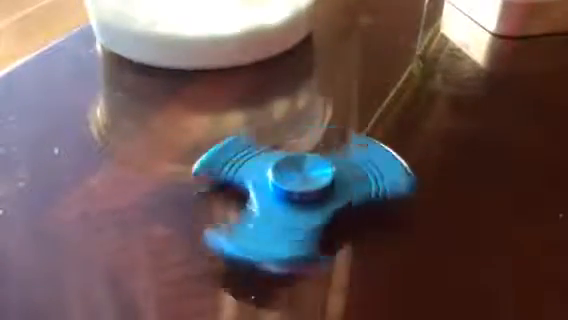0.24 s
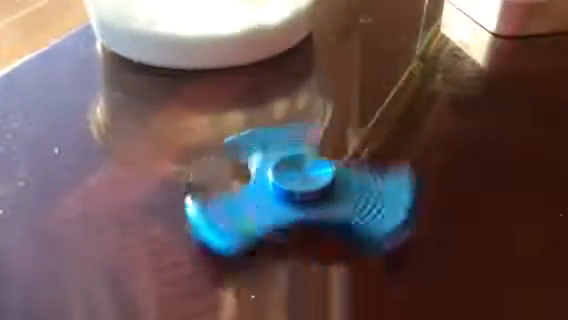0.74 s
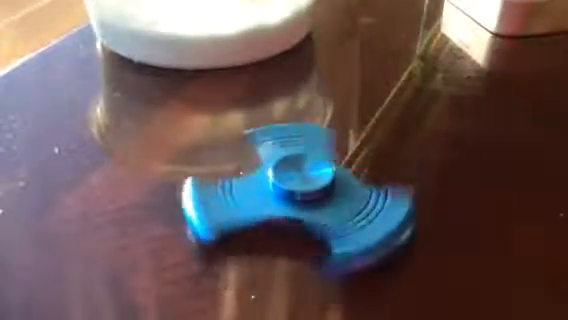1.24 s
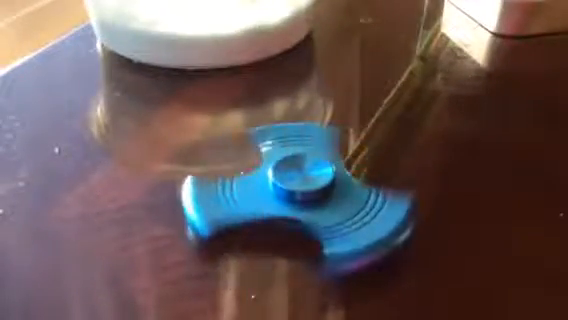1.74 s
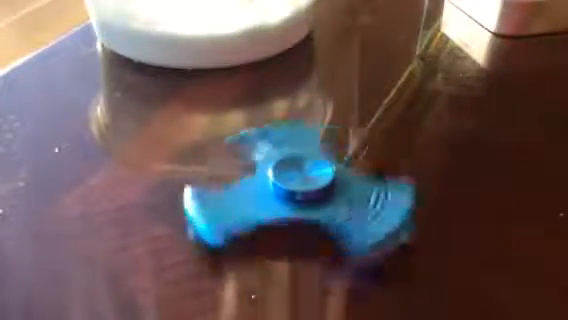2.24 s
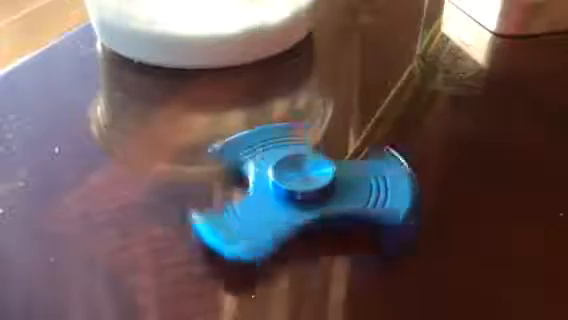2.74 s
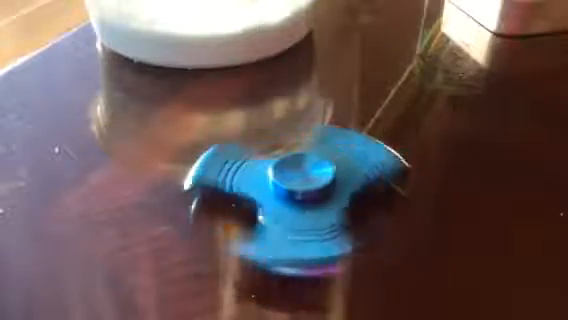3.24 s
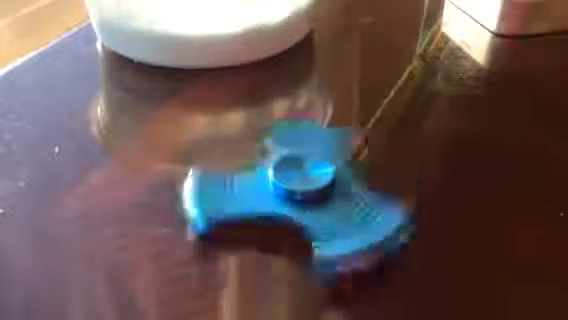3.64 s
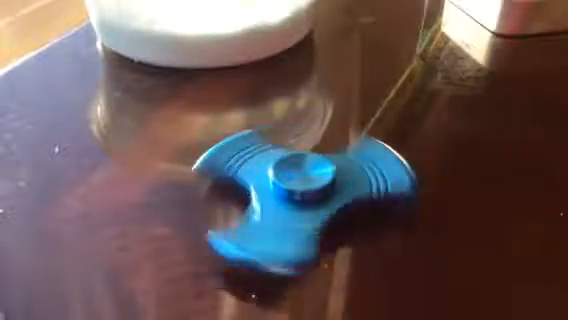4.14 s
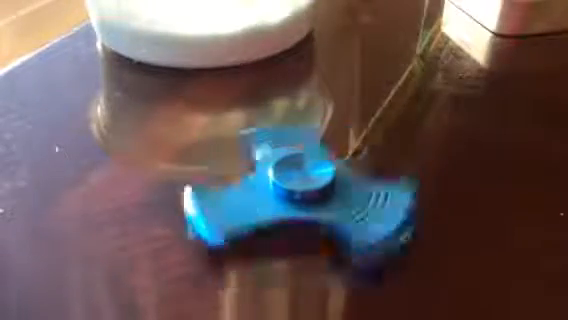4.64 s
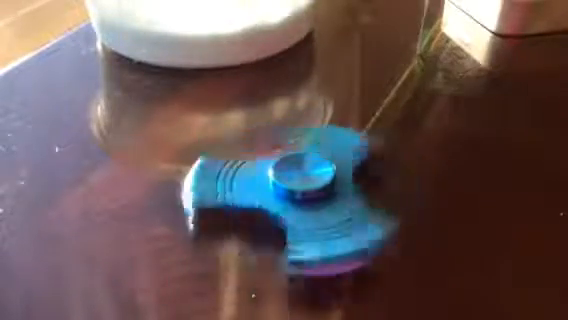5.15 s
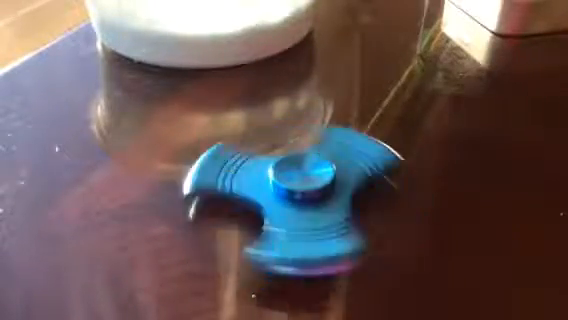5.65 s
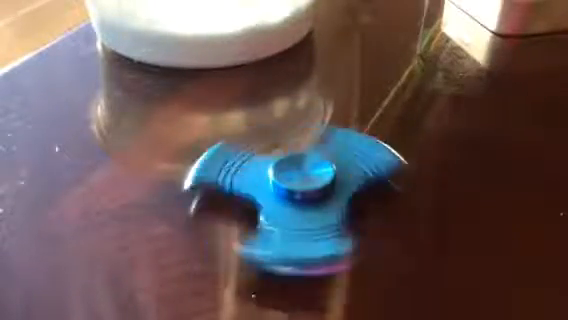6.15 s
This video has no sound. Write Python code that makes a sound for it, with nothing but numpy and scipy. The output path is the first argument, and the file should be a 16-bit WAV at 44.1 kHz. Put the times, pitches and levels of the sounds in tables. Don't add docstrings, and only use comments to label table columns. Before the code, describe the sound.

A three-armed metal spinner whirs without pause on a wooden table, close to a phone microphone in a quiet room. Its hollow mid-range drone throbs and flutters, with quick uneven knocks of bearing balls, brief woody surges and fine gritty scrapes. A faint metallic shimmer sits on top, easing slightly. Low room rumble and soft hiss lie beneath; one faint thud comes early, and two tiny dry rustles come at the end.

```python
import sys
import numpy as np
from scipy import signal
from scipy.fft import rfft, irfft, next_fast_len
from scipy.io import wavfile
from scipy.ndimage import uniform_filter1d

SR = 44100
rng = np.random.default_rng(int(sys.argv[2]) if len(sys.argv) > 2 else 0)


def wrap_up_sound(samples):
    columns = np.atleast_2d(samples).T
    tamed = np.clip(columns, -1, 1)
    steps = np.round(tamed * 32767).astype(np.int16)
    wavfile.write(sys.argv[1], SR, steps)


def undo_db(level):
    steps = np.asarray(level, float) / 20
    return 10 ** steps


N = 282181

SLOWING_PER_S, EASING_PER_S2 = .024, .0004
# f/Hz, width/Hz, level/dB
KNOCK_MODES = [(322.3, 12.2, -2), (352.5, 16, 0.5), (374.7, 52, -3.5), (424, 44, 1), (461, 6.3, -10),
               (518.6, 10, -1.5), (603, 160, -0.5), (716, 58, -6)]
# f/Hz, width/Hz, level/dB
UPPER_MODES = [(995, 63, -22), (978, 34, -4.5), (1075, 75, 3.5), (1080, 31, -4), (1190, 111, 2),
               (1250, 60, -8), (1411, 124, 3), (1479, 51, 4), (1566, 51, -8.5), (1612, 20, -3),
               (1739, 85, 0), (1795, 87, -5), (1970, 60, -41), (1968, 180, -9), (2120, 48, -11),
               (2283, 227, -10.5)]
# f/Hz, width/Hz, level/dB
METAL_MODES = [(2677, 170, -2.5), (3100, 180, -4), (3500, 260, -3.5), (3640, 140, -15), (3960, 270, -6),
               (4340, 220, -9.5), (4896, 340, -3), (5300, 260, -5.5), (5820, 250, -2.5), (6500, 610, -2),
               (6820, 640, 2.5), (7600, 750, -13), (8120, 510, -4), (9000, 1800, -11.5), (10600, 2000, -17)]
# t/s, peak level/dB
KNOCKS = [(0.089, -50), (0.239, -52), (0.395, -47.5), (0.549, -52.5), (0.859, -52.5), (0.983, -51),
          (1.265, -53), (1.581, -51.5), (1.74, -53), (1.867, -50.5), (1.897, -50), (1.964, -50),
          (2.09, -49.5), (2.413, -49.5), (2.541, -51), (2.705, -48.5), (2.868, -50), (2.933, -46.5),
          (3.163, -47), (3.392, -51.5), (3.925, -50), (4.663, -52.5), (4.903, -48), (5.008, -51.5),
          (5.075, -49), (5.317, -49.5), (5.489, -55), (5.731, -54.5), (6.045, -56.5), (6.223, -47)]


def to_rms(x, db=0):
    return x * undo_db(db) / np.sqrt(np.mean(x ** 2))


def colour(x, gain):
    size = next_fast_len(N + SR // 2, True) // 2 * 2
    f_hz = np.arange(size // 2 + 1) * SR / size
    cepstrum = irfft(np.log(gain(f_hz) + 1e-7), size)
    cepstrum[1:size // 2] *= 2
    response = np.exp(rfft(cepstrum[:size // 2], size))
    return irfft(rfft(np.resize(x, size)) * response, size)[:N]


def ring(x, modes):
    def gain(f):
        power = sum(undo_db(db) ** 2 / (1 + ((f - hz) / (width_hz * 0.6)) ** 2) ** 2
                    for hz, width_hz, db in modes)
        return np.sqrt(power)
    return colour(x, gain)


def even(x, span_s):
    size = int(span_s * SR)
    power = uniform_filter1d(uniform_filter1d(x ** 2, size), size)
    return x / np.sqrt(power + 1e-18)


def add(out, s, burst):
    i = int(s * SR)
    out[i:i + len(burst)] += burst[:N - i]


def shaped(points, db):
    hz, gain_db = np.transpose(points)
    noise = rng.standard_normal(N)
    return to_rms(colour(noise, lambda f: undo_db(np.interp(np.log(f + 1), np.log(hz), gain_db))), db)


def puff(hz, width_hz, length_s, rise=0.057):
    size = int(length_s * SR) + 8
    u = np.arange(2 * size) / size
    edges_hz = np.clip([hz - width_hz / 2, hz + width_hz / 2], 30, .45 * SR)
    band = signal.butter(4, edges_hz, "band", fs=SR, output="sos")
    noise = signal.sosfilt(band, rng.standard_normal(SR // 4))[-2 * size:]
    return to_rms(noise) * np.minimum(u / rise, 1) * np.exp(-2 * u) / 2


def room():
    # f/Hz, level/dB per Hz
    rumble_spectrum = [(18, -34), (30, -17.5), (48, -3), (70, -3.5), (95, 0), (167, -4.5), (265, -3),
                       (300, -1.5), (390, -28.5), (660, -100)]
    # f/Hz, width/Hz, level/dB
    hum_mode = [(54, 13, 0)]
    # f/Hz, level/dB per Hz
    hiss_spectrum = [(1500, -4.5), (4000, 5), (9000, 3.5), (10100, -0.5), (12400, 0), (16000, -2.5)]
    out = shaped(rumble_spectrum, -73)
    out += to_rms(ring(rng.standard_normal(N), hum_mode), -83.5)
    out += shaped(hiss_spectrum, -80)
    thud_s, thud_db, thud_hz, length_s = .875, -64, 198, .095
    t = np.arange(int(length_s * SR)) / SR
    swell = np.sin(np.pi * t / length_s)
    add(out, thud_s, undo_db(thud_db) * swell * np.sin(2 * np.pi * thud_hz * t))
    return out


def rustles():
    # t/s, peak level/dB, f/Hz, width/Hz, length/s
    rustle_puffs = [
        (5.991, -63, 9000, 12000, .06),
        (6.002, -70, 14400, 3000, 0.0052),
        (6.012, -71, 11300, 500, .06),
        (6.019, -59, 3100, 1500, 0.013),
        (6.022, -54.5, 6500, 4000, 0.014),
        (6.034, -58, 10000, 12000, 0.0071),
        (6.352, -63, 11200, 7000, 0.017),
        (6.36, -65, 11500, 6500, .006),
    ]
    # t/s, peak level/dB, f/Hz, width/Hz, length/s
    snaps = [
        (6.358, -49, 10500, 6000, .001),
        (6.368, -55, 11500, 7500, .001),
        (6.369, -50, 11000, 7000, .0009),
        (6.3727, -42, 12500, 6500, .0008),
        (6.3776, -53, 11500, 7500, .001),
    ]
    out = np.zeros(N)
    for s, db, hz, width_hz, length_s in rustle_puffs + snaps:
        add(out, s, undo_db(db) * puff(hz, width_hz, length_s))
    return out


def grit():
    # t/s, peak level/dB, f/Hz
    grains = [(0.1291, -58, 3570), (0.276, -59, 3350), (0.2977, -60, 2650), (0.425, -59, 3130),
              (0.7108, -59, 2690), (0.8285, -61, 3070), (0.859, -58, 4850), (1.307, -57, 2930),
              (1.3927, -61, 2620), (1.6053, -60, 2750), (1.9048, -60, 4650), (2.0617, -58, 3100),
              (2.3496, -56, 2720), (2.657, -59, 3180), (2.8145, -58, 4800), (2.9347, -61, 3960),
              (3.395, -62.5, 4860), (3.4376, -60, 4800), (4.0258, -64, 4930), (4.063, -56.5, 3570),
              (4.7127, -60, 3380), (4.8653, -59.5, 2740), (5.2999, -59.5, 4700), (5.3507, -59.5, 3410),
              (5.514, -58.5, 3520), (5.68, -66, 4700), (6.012, -61, 5060), (6.177, -58, 3450),
              (6.343, -56, 3010), (6.3679, -58, 2590)]
    knock_scrapes = [(s, db - 20, 3800) for s, db in KNOCKS]
    scrapes = np.zeros(N)
    for s, db, hz in grains + knock_scrapes:
        add(scrapes, s, puff(hz + 400, 4000, .0065) * undo_db(db))
    return undo_db(9.0) * ring(scrapes, METAL_MODES)


def speed_lost():
    t = np.arange(N) / SR
    return SLOWING_PER_S * t - EASING_PER_S2 * t ** 2


def throb(part, sharp=0.):
    start_hz = dict(ball=32.8, shaft=13.877, cage=8.56, arms=20.83, tick=6.94)
    peak_turn = dict(ball=.02, shaft=.54, cage=.2, arms=.52, tick=.92)
    t = np.arange(N) / SR
    run_s = t - SLOWING_PER_S * t ** 2 / 2 + EASING_PER_S2 * t ** 3 / 3
    turns = start_hz[part] * run_s - peak_turn[part]
    return np.cos(2 * np.pi * turns) + sharp * np.cos(4 * np.pi * turns)


def rolling(grain_db, grain_hz, **depth_db):
    hold = int(SR / grain_hz)
    flicker = uniform_filter1d(np.repeat(rng.standard_normal(N // 20), hold)[:N], hold)
    beat_db = sum(db * throb(part, .6 if part == "ball" else 0) for part, db in depth_db.items())
    return rng.standard_normal(N) * undo_db(grain_db * flicker + beat_db)


def load_db():
    # t/s, level/dB, cage throb/dB
    course = [(0.0, -48.5, -0.7), (0.6, -46.5, 0), (1.0, -49, 1.5), (1.2, -49, 2), (1.44, -46, 0),
              (1.75, -48.5, 1), (2.3, -47.5, 0.5), (3.0, -48.5, 1.5), (3.6, -48, 1), (4.0, -47, 0.5),
              (4.6, -47.5, 0.5), (5.1, -47.5, 0.5), (5.3, -49, 0), (5.9, -48.5, -0.5), (6.4, -48.5, 1.5)]
    # t/s, depth/dB, length/s
    slips = [(0.545, 12.5, .03), (1.623, 3.5, .025), (2.244, 15, 0.014), (2.382, 5.5, .02),
             (3.324, 4, 0.035), (3.9, 6, 0.015), (4.01, 4.5, 0.041), (4.144, 5, 0.017), (4.275, 6, 0.026),
             (4.535, 9, 0.015), (4.793, 3.5, .03), (5.012, 12, 0.011), (5.063, 6, 0.011),
             (5.983, 4.5, 0.025), (6.11, 4.5, 0.014), (6.215, 9, 0.014)]
    t = np.arange(N) / SR
    s, level_db, throb_db = np.transpose(course)
    slip_db = sum(db * np.exp(-((t - at) / length_s) ** 2 * 2) for at, db, length_s in slips)
    return np.interp(t, s, level_db) + np.interp(t, s, throb_db) * throb("cage") - slip_db


def dust(per_s, spread_db, length_s):
    hardness_db = spread_db * np.minimum(rng.exponential(size=N), 2)
    hits = (rng.random(N) < per_s / SR) * undo_db(hardness_db)
    decay = np.exp(-np.arange(SR // 50) / (length_s * SR))
    return signal.fftconvolve(hits, decay)[:N] * rng.standard_normal(N)


def metal_song(load_change_db):
    settle_db = 1.5 * np.exp(-np.arange(N) / SR / 0.92)
    gain = undo_db(-77 + settle_db - 19 * speed_lost() + 0.16 * load_change_db)
    force = rolling(0.66, 150, arms=1.2, cage=0.3, ball=0.46, tick=0.24)
    out = undo_db(4.0) * gain * even(ring(force, METAL_MODES), 0.16)
    specks = dust(per_s=60, spread_db=3.5, length_s=0.0022)
    return out + gain * to_rms(ring(specks, UPPER_MODES[-4:] + METAL_MODES[:8]), -7.0)


def narrow_mode():
    # f/Hz, width/Hz, level/dB
    mode = [(487, 14, 0)]
    # t of peak/s, peak level/dB, fall/s
    wakes = [(0.18, -69, .05), (0.64, -69, .04), (1.04, -54, 0.052), (1.24, -59, .04), (1.37, -52, 0.076),
             (1.55, -64, .03), (1.71, -57, 0.028), (2.16, -68, .05), (3.3, -62, .03), (3.42, -60, 0.044),
             (4.9, -65, .03), (5.33, -67, .05), (5.74, -67, .05)]
    t, rise_s = np.arange(N) / SR, 0.026
    gain = undo_db(-68) * np.ones(N)
    for s, db, fall_s in wakes:
        gain += undo_db(db) * np.exp(-np.where(t < s, (s - t) / rise_s, (t - s) / fall_s))
    force = rolling(0.28, 27, ball=0.47, shaft=1.8)
    return gain * even(ring(force, mode), 0.093)


def knocks():
    blows, wave = np.zeros(N), throb("ball")
    at = np.flatnonzero((wave[1:-1] > wave[:-2]) & (wave[1:-1] >= wave[2:]))
    chance = rng.standard_normal((len(at), 2))
    usual = np.abs(at[:, None] / SR - np.array(KNOCKS)[:, 0]).min(axis=1) > .014
    size = undo_db(-59 + 2.6 * throb("shaft")[at] + 1.45 * chance[:, 0]) * usual
    jitter = (.0015 * SR * chance[:, 1]).astype(int)
    blows[np.clip(at - int(.005 * SR) + jitter, 0, N - 1)] = size
    for s, db in KNOCKS:
        blows[int(s * SR)] = undo_db(db + 1.5)
    unit_peak = np.abs(ring(signal.unit_impulse(N), KNOCK_MODES[:5])).max()
    return ring(blows, KNOCK_MODES) / unit_peak


def surges(drone):
    # t/s, peak level/dB, f/Hz
    catches = [(0.179, -33.5, 714), (0.372, -36, 680), (0.612, -35, 643), (1.106, -32.5, 742),
               (1.281, -35.5, 742), (1.422, -31, 697), (1.469, -32, 707), (1.641, -35, 698),
               (2.027, -35.5, 609), (2.101, -34.5, 734), (2.261, -33.5, 724), (2.411, -34.5, 753),
               (2.543, -36, 732), (2.772, -31.5, 724), (3.275, -32.5, 682), (3.655, -34, 627),
               (3.716, -36, 649), (3.912, -34, 647), (4.022, -33, 679), (4.157, -35.5, 666),
               (4.295, -36.5, 662), (4.557, -32, 577), (4.733, -35.5, 729), (4.833, -30.5, 632),
               (4.946, -33.5, 658), (4.97, -34, 639), (5.089, -33.5, 634), (5.609, -33, 627),
               (5.729, -33, 613), (6.291, -32, 647)]
    out, loss, t = np.zeros(N), np.zeros(N), np.arange(SR // 10) / SR
    swing = (1 - np.exp(-t / 0.0028)) * np.exp(-t / 0.014)
    falter = np.interp(t, [0, .006, .014, .04], [0.12, 0.52, 0.31, 0.07])
    for s, db, hz in catches:
        add(out, s, undo_db(db - 2.0) * swing * np.sin(2 * np.pi * hz * t))
        add(loss, s - .01, falter)
    return out + drone * np.clip(1 - loss, .05, 1)


def spinner():
    # f/Hz, width/Hz, level/dB
    drone_modes = [(553, 8.7, -27.5), (579.3, 38, -5.5), (607.6, 16, -2), (641, 65.7, -2),
                   (708.6, 27.3, -0.5), (752.4, 46.2, -1.5), (806, 33, -16), (770, 23, -41)]
    load = load_db()
    load_change_db = load - np.mean(load)
    force = rolling(1.0, 60, cage=0.26, ball=1.26)
    out = surges(undo_db(load) * even(ring(force, drone_modes), 0.051))
    upper_gain = undo_db(-65 - 10.5 * speed_lost() + 0.33 * load_change_db)
    out += undo_db(0.77) * upper_gain * even(ring(force, UPPER_MODES), 0.26)
    unbalanced = force * undo_db(0.84 * throb("shaft"))
    out += to_rms(ring(unbalanced, KNOCK_MODES[:6]), -65.5)
    return out + narrow_mode() + metal_song(load_change_db)


def scene():
    return (room() + rustles() + grit() + knocks() + spinner())[None]


def band_limit(x):
    return signal.sosfilt(signal.butter(12, 15200, fs=SR, output="sos"), x)


def record(dry):
    # f/Hz, width/Hz, level/dB
    port_dips = [(13300, 300, -4.8), (14450, 200, -2.5), (5520, 80, -5), (6230, 70, -4), (441, 6, -6)]

    def gain(f):
        return undo_db(sum(db * np.exp(-((f - hz) / width_hz) ** 2 / 2) for hz, width_hz, db in port_dips))
    port = colour(dry[0], gain)
    return band_limit(port[None])


dry = scene()
out = record(dry)
wrap_up_sound(out)
```